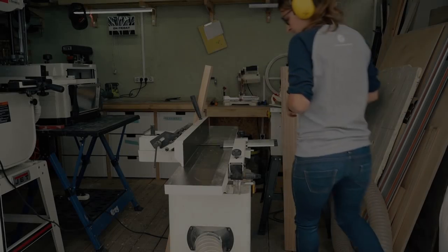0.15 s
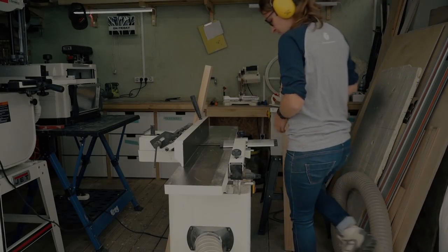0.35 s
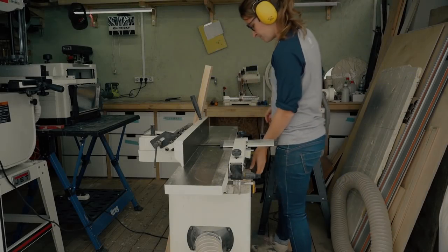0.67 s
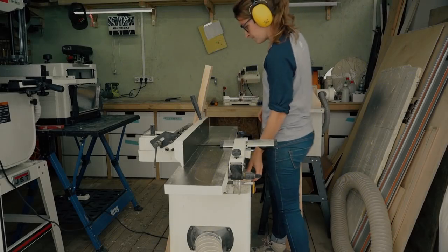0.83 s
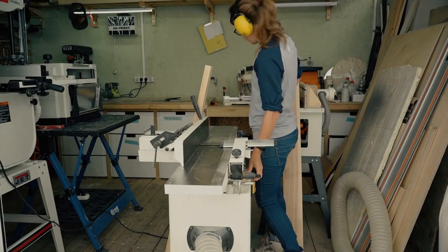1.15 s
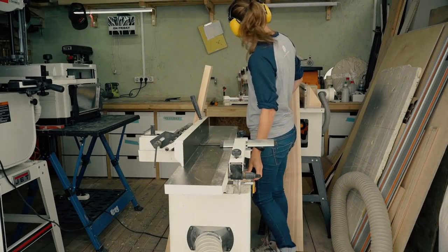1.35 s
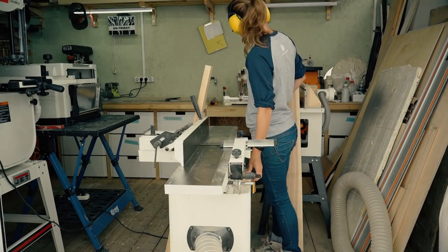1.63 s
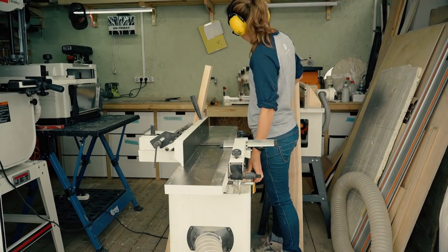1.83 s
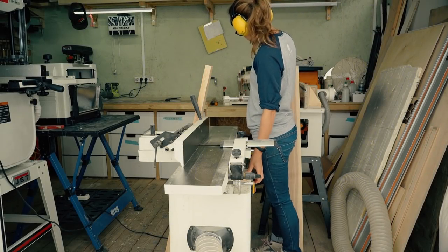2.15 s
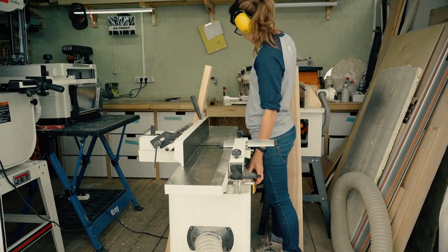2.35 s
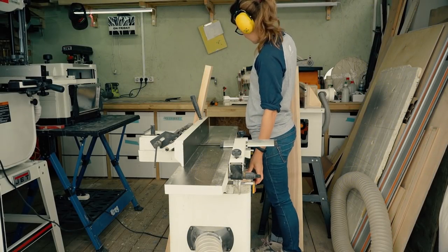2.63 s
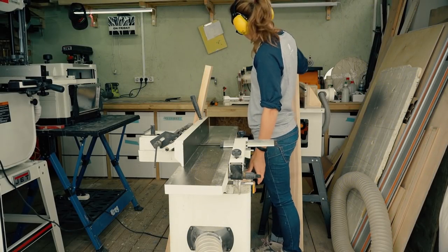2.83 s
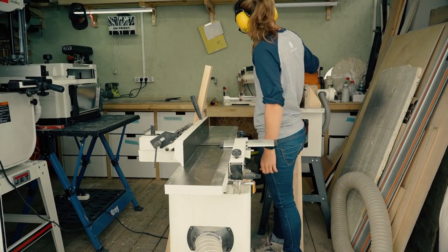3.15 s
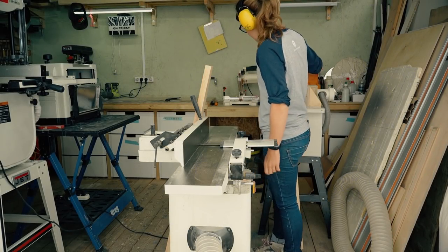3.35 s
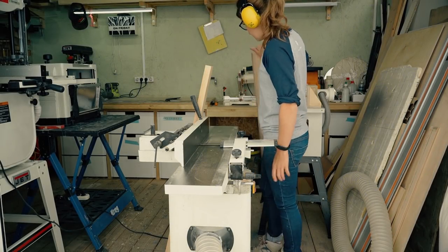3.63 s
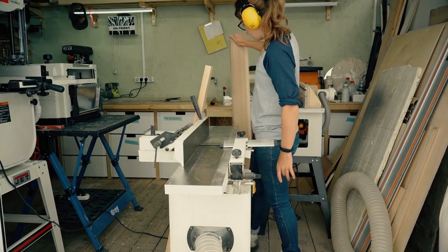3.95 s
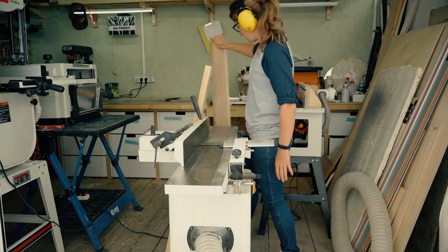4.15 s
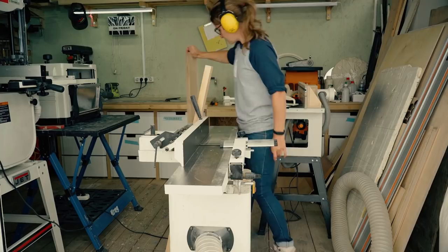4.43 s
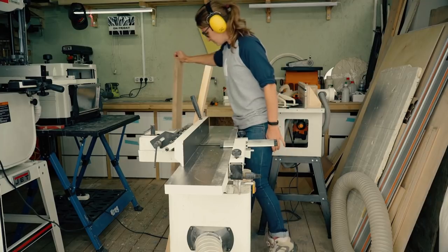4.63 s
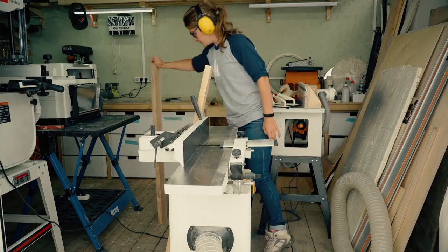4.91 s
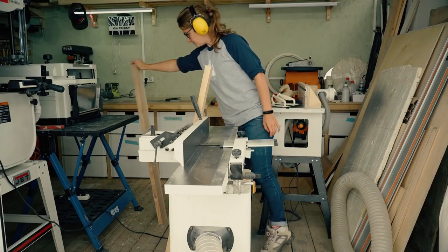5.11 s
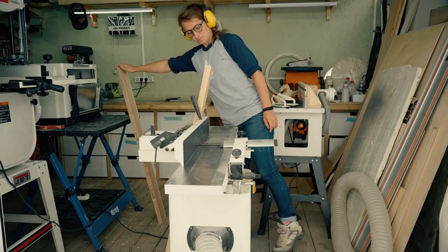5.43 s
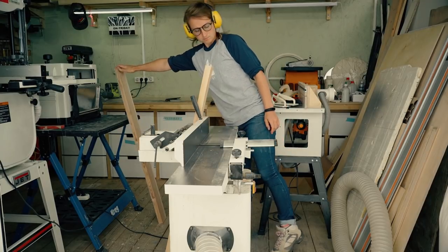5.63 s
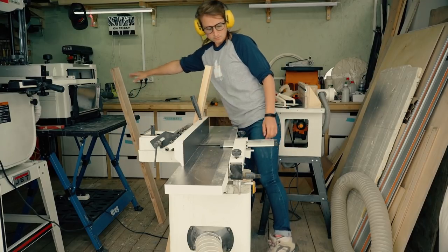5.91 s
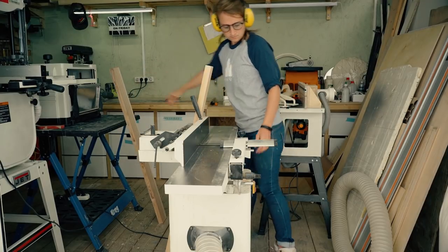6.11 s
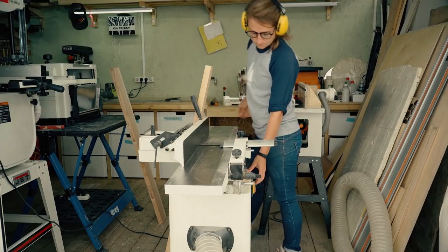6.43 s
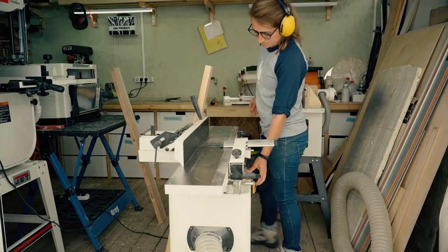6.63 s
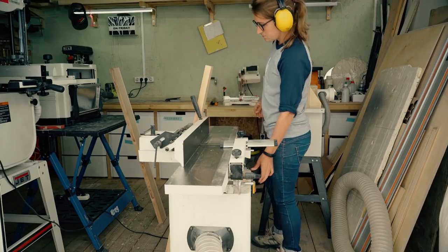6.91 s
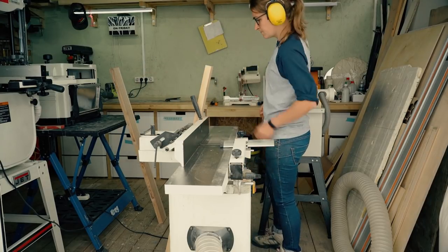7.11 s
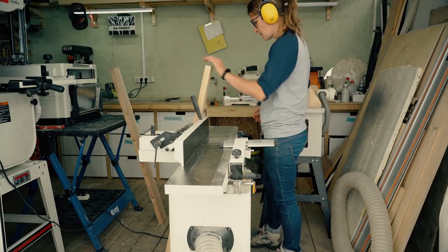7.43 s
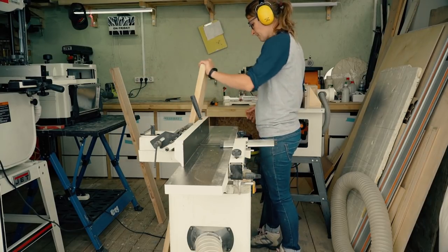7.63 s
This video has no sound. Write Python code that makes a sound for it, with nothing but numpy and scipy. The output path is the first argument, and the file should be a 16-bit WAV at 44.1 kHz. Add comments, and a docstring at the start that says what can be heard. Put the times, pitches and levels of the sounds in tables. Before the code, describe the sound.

Boards thump and knock on a plank floor in a quiet workshop, then a woodworking machine switches on, whining and squealing into a steady rushing hum.

```python
"""A small workshop with a plank floor, quiet but for a low rumble of feet and a faint hum.
Boards are stood on the floor and leaned against a bench: blows ring decaying modes and the room.
A jointer's fence slides, sleeves brush and wood creaks: swells of random catches; a leaning board rocks to rest.
Then the jointer is switched on: gliding tones growl, whine and squeal as the motor strains and the belt slips.
The cutterhead settles into a hum of steady partials in a rush of coloured noise."""
import sys
import numpy as np
from scipy import signal
from scipy.fft import rfft, irfft, next_fast_len
from scipy.io import wavfile
from scipy.ndimage import map_coordinates

SR = 44100
rng = np.random.default_rng(int(sys.argv[2]) if len(sys.argv) > 2 else 0)


def file_out(sig):
    """Save sig as 16-bit WAV at sys.argv[1]."""
    # one column per channel
    cols = np.atleast_2d(sig).T
    # limit, then scale
    lim = np.clip(cols, -1, 1)
    pcm = np.round(lim * 32767).astype(np.int16)
    wavfile.write(sys.argv[1], SR, pcm)


N = 342216


def amp(db):
    """Decibels to gain."""
    return 10 ** (np.asarray(db) / 20)


def unit(x):
    """x at rms 1."""
    return x / np.sqrt(np.mean(x ** 2) + 1e-20)


def along(points, hz):
    """(Hz, value) points interpolated on a log frequency axis."""
    point_hz, values = np.transpose(points)
    return np.interp(np.log(hz + 1), np.log(point_hz + 1), values)


def curves(rows):
    """One value per sample for each column after the time."""
    s, *columns = np.transpose(rows)
    return [np.interp(np.arange(N) / SR, s, column) for column in columns]


def wobble(knots_per_s):
    """A smooth random curve of rms 1."""
    knots = rng.standard_normal(N // 20)
    return unit(map_coordinates(knots, [np.arange(N) * knots_per_s / SR], mode="wrap"))


def swell(full_s, hold_s, rise_db_per_s, fall_db_per_s):
    """A gain that climbs to 1, holds and dies away, at constant dB per second."""
    t = np.arange(N) / SR - full_s
    return amp(-rise_db_per_s * np.maximum(-t, 0) - fall_db_per_s * np.maximum(t - hold_s, 0))


def resonant(peaks, hz):
    """Summed gain of (Hz, width Hz, dB) resonances; width is taken at half gain."""
    return sum(amp(db) / (1 + (2 * (hz - centre) / width) ** 2) for centre, width, db in peaks)


def coloured(x, gain):
    """x through a causal minimum-phase filter with gain(hz), built by folding the cepstrum."""
    n = x.shape[-1]
    m = 2 * next_fast_len(n // 2 + 4096)
    log_gain = np.log(np.maximum(gain(np.fft.rfftfreq(m, 1 / SR)), 1e-6))
    cepstrum = irfft(log_gain, m)
    cepstrum[1:m // 2] *= 2
    cepstrum[m // 2 + 1:] = 0
    return irfft(rfft(x, m) * np.exp(rfft(cepstrum)), m)[..., :n]


def shaped(x, spectrum):
    """x with a (Hz, dB) colour."""
    return coloured(x, lambda hz: amp(along(spectrum, hz)))


# Stereo width of noise. Each row: frequency in Hz, left-right correlation (0-1).
LEFT_RIGHT_LIKENESS = [(100, .96), (300, .93), (600, .86), (1000, .82), (2500, .7), (5000, .38),
                       (12000, .22)]


def stereo_noise(size):
    """White noise, nearly mono in the bass and wide in the treble, from a mid and a side part."""
    m = next_fast_len(size)
    likeness = along(LEFT_RIGHT_LIKENESS, np.fft.rfftfreq(m, 1 / SR))
    turn = np.arccos(np.clip(likeness, -1, 1)) / 2
    white = rfft(rng.standard_normal((2, m)))
    mid, side = irfft(white * [np.cos(turn), np.sin(turn)], m)
    return np.array([mid + side, mid - side])[:, :size]


def noise(spectrum):
    """Coloured stereo noise of rms 1."""
    return unit(shaped(stereo_noise(N), spectrum))


# Room decay at length 1. Each row: frequency in Hz, t60 in seconds.
ROOM_DECAY = [(70, 0.94), (135, 0.69), (250, 0.28), (700, 0.44), (2000, 0.35), (5000, 0.3), (12000, 0.3)]


def shop(direct_db, length=1):
    """The room's answer to a click, left energy 1: direct sound plus a tail whose treble dies before its bass."""
    hz, t, z = signal.stft(stereo_noise(SR), SR, nperseg=256)
    decay = amp(-60 * t / (length * along(ROOM_DECAY, hz)[:, None]))
    tail = signal.istft(z * decay, SR, nperseg=256)[1][:, :SR]
    tail /= np.linalg.norm(tail[0])
    tail[:, 0] += amp(direct_db)
    return tail / np.linalg.norm(tail[0])


def add(track, s, sound):
    """Mix a sound in at s seconds."""
    start = max(round(s * SR), 0)
    track[:, start:start + sound.shape[1]] += sound[:, :N - start]


def tone(hz):
    """A sine of rms 1 that follows a pitch curve from a random phase."""
    return np.sqrt(2) * np.sin(2 * np.pi * (np.cumsum(hz) / SR + rng.random()))


def blows(table, modes, spectrum, ring_db, direct_db, length, scatter_db, spot_db):
    """Each blow rings decaying modes and sends a burst into the room; the struck spot favours one range."""
    out, t = np.zeros((2, N)), np.arange(SR) / SR
    sides = np.array([[.5], [-.5]])
    for s, db, bass_db, treble_db, spot_hz in table:
        ring = np.zeros((2, SR))
        for k, (mode_hz, mode_db, t60) in enumerate(modes):
            decay = amp(mode_db + scatter_db * rng.normal() - 60 * t / t60)
            balance = 1 + 0.04 * sides * rng.normal()
            ring += (-1) ** k * decay * np.sin(2 * np.pi * mode_hz * t) * balance
        burst = unit(shaped(shop(direct_db, length), spectrum))
        hit = amp(ring_db) * unit(ring) + burst
        contact = [(140, bass_db), (330, 0.026), (700, 0), (4000, treble_db)]

        def contact_gain(hz):
            spot = np.exp(-(np.log2((hz + 1) / spot_hz) / 0.33) ** 2)
            return amp(along(contact, hz) + spot_db * spot)

        hit = coloured(hit, contact_gain)
        onset_rms = np.sqrt(np.mean(hit[:, :SR // 32] ** 2))
        add(out, s, amp(db) * hit / onset_rms)
    return out


# The leaning board rocks to rest; each flight is FLIGHT_SHRINK times the one before.
BOUNCE_S, FLIGHT_S, FLIGHT_SHRINK, BOUNCE_LOSS_DB = 5.983, 0.078, 0.7, 4


def rocking(first_db, bass_db, treble_db, spot_hz, count):
    """Contacts of the leaning board, ever sooner and weaker."""
    flights = [FLIGHT_SHRINK ** k for k in range(count - 1)]
    times = BOUNCE_S + FLIGHT_S * np.cumsum([0] + flights)
    return [(s, first_db - BOUNCE_LOSS_DB * k, bass_db, treble_db, spot_hz) for k, s in enumerate(times)]


# Boards and feet landing on the floor. Each row: start in seconds, level in dB, bass in dB, treble in dB,
# favoured frequency in Hz.
FLOOR_THUMPS = [(0.0, -32.5, -5.5, -2.5, 327), (0.747, -43, -3.5, 7, 350), (0.829, -51.5, -21, -8, 298),
                (2.33, -60, 18, -8, 137), (3.128, -57, 1, -8, 245), (4.971, -13.5, -1.5, -14.5, 217),
                (6.398, -51, 4, -3, 280)]
# Wood knocking on wood and iron. Each row: start in seconds, level in dB, bass in dB, treble in dB,
# favoured frequency in Hz.
WOOD_KNOCKS = [(0.002, -49, -22, 0, 433), (0.071, -48.5, 17, 18.5, 138), (0.770, -55, -6, -2, 2300),
               (4.506, -56.5, -18, 6, 397), (4.674, -59.5, -23, 7, 390), (4.973, -34, -2.5, 8.5, 965),
               (5.835, -34.5, -2.5, 1.5, 1590), (5.842, -34.5, -4, -4, 306), (5.866, -37, -9, 5, 322),
               (6.438, -61.5, 1, 8, 390), (6.556, -57.5, 0, 0, 2760)]
# The drive jolts at switch-on. Each row: start in seconds, level in dB, treble in dB, favoured frequency in Hz.
DRIVE_JOLTS = [(6.715, -42.5, -9, 690), (6.742, -38.5, -3.5, 1190)]
# Small hard contacts and the switch. Each row: start in seconds, level in dB, treble in dB.
HARD_CLICKS = [(0.008, -47, 2), (4.504, -55, 2.5), (4.978, -46, 2), (5.835, -51, -0.5), (6.061, -58.5, 0),
               (6.745, -52.5, 16.5)]
# Ringing of the planks under a board. Each row: frequency in Hz, relative level in dB, t60 in seconds.
PLANK_MODES = [(72, -16, .4), (112, -10, .2), (131, -23, 1.1), (140, -23, .9), (180, -5, .12),
               (203, -1, .22), (240, -3, .18), (283, -2, .2), (385, -11, .26), (445, -12, .15),
               (499, -13, .25), (575, -21, .3), (745, -22, .15), (955, -15, .24), (1066, -20, .17),
               (1170, -21, .22)]
# Ringing of a board. Each row: frequency in Hz, relative level in dB, t60 in seconds.
BOARD_MODES = [(255, -6, .15), (323, 0, .17), (501, -11, .25), (807, -14, .3), (1222, -16, .33),
               (1437, -17, .3), (1600, -11, .15), (1739, -16, .27), (1820, -16, .3), (2315, -16, .25),
               (3090, -21, .3), (3365, -26, .45), (4624, -26, .18)]
# Colour of a thump's burst. Each row: frequency in Hz, gain in dB.
THUMP_COLOUR = [(24, -95), (40, -38), (116, -5.5), (156, 2.5), (211, -15), (298, -9), (329, -8), (454, -10),
                (502, -15), (693, -18), (933, -35), (1260, -61), (2990, -44), (15000, -53.5)]
# Colour of a knock's burst. Each row: frequency in Hz, gain in dB.
KNOCK_COLOUR = [(47, -28), (80, -0.5), (206, -2), (321, -2.5), (436, -5.5), (498, 0), (725, -10.5),
                (791, -5), (864, -7.5), (1870, -17), (2490, -16.5), (15500, -45.5)]
# Colour of a click's burst. Each row: frequency in Hz, gain in dB.
CLICK_COLOUR = [(150, -6.5), (500, 4.5), (1500, -1.5), (3500, -6.5), (6000, -7.5), (11000, -6),
                (15500, -19)]
CLICK_BASS_DB, CLICK_HZ, JOLT_BASS_DB = -3, 3000, -30


def impacts():
    """Thumps ring the floor; knocks, jolts and clicks ring a board; the rocking board's foot and tip do both."""
    on_floor = FLOOR_THUMPS + rocking(first_db=-44, bass_db=4, treble_db=-5, spot_hz=290, count=3)
    on_wood = WOOD_KNOCKS + rocking(first_db=-50.5, bass_db=-9, treble_db=0, spot_hz=1580, count=3)
    on_wood += [(s, db, JOLT_BASS_DB, treble_db, hz) for s, db, treble_db, hz in DRIVE_JOLTS]
    hard = [(s, db, CLICK_BASS_DB, treble_db, CLICK_HZ) for s, db, treble_db in HARD_CLICKS]
    thumps = blows(on_floor, PLANK_MODES, THUMP_COLOUR,
                   ring_db=1, direct_db=-3.5, length=0.91, scatter_db=0.5, spot_db=4.5)
    knocks = blows(on_wood, BOARD_MODES, KNOCK_COLOUR,
                   ring_db=-7, direct_db=-19, length=1, scatter_db=4.5, spot_db=8)
    clicks = blows(hard, BOARD_MODES, CLICK_COLOUR,
                   ring_db=-14, direct_db=-4, length=0.4, scatter_db=2, spot_db=4)
    return thumps + knocks + clicks * amp([[-3], [2]])  # clicks sit to the right


def strokes(table, body, grain_db, direct_db):
    """Sliding contact: a swell of tiny uneven catches through the body's response, low-passed at top_hz."""
    out, t = np.zeros((2, N)), np.arange(SR // 2) / SR - 1 / 4
    for s, db, rise, fall, top_hz in table:
        envelope = np.exp(-np.where(t < 0, (t / rise) ** 2, t / fall))
        grain = np.minimum(rng.standard_normal(len(t)), 3)
        catches = rng.standard_normal(len(t)) * amp(grain_db * grain)
        rub = unit(coloured(catches, lambda hz: body(hz) / np.sqrt(1 + (hz / top_hz) ** 6)))
        heard = signal.fftconvolve((envelope * rub)[None], shop(direct_db), axes=1)
        add(out, s + t[0], amp(db) * heard)
    return out


# Sliding strokes and scuffs. Each row: peak in seconds, level in dB, rise in seconds, fall in seconds,
# low-pass in Hz.
SLIDES = [(0.790, -48, 0.035, 0.012, 14000), (0.852, -53, 0.011, 0.0082, 4450),
          (1.270, -60, 0.041, 0.0092, 4500), (1.386, -39.5, 0.0092, 0.025, 8000),
          (2.732, -42.5, 0.0056, 0.011, 1520), (2.749, -38, 0.0097, 0.02, 4460),
          (3.450, -65, 0.061, 0.028, 12000), (4.785, -61, 0.061, 0.075, 11000)]
# Sleeves and hands brushing the wood. Each row: peak in seconds, level in dB.
SLEEVE_BRUSHES = [(0.43, -69.5), (0.80, -59), (1.415, -56.5), (3.425, -67), (3.93, -70), (4.255, -65),
                  (4.385, -65.5), (4.78, -68)]
# Wood creaking under the hand. Each row: peak in seconds, level in dB, rise and fall in seconds, low-pass in Hz.
WOOD_CREAKS = [(1.275, -61, 0.014, 3800), (1.91, -74, .03, 1500), (2.335, -71, 0.025, 2800),
               (2.679, -54, 0.021, 6000), (5.235, -67.5, 0.054, 2200), (5.785, -63, 0.073, 2580)]
# Colour of sliding. Each row: frequency in Hz, gain in dB.
SLIDE_COLOUR = [(50, -38.5), (130, 2), (350, -6), (650, -5), (800, -4.5), (1050, -10.5), (1550, -6),
                (1950, -4.5), (2700, -7.5), (5000, -15), (15500, -26)]
# Colour of brushing cloth. Each row: frequency in Hz, gain in dB.
CLOTH_COLOUR = [(1500, -19), (5000, -4), (10000, 4), (15000, 1.5)]
# Tones of a creak. Each row: frequency in Hz, width in Hz, gain in dB.
CREAK_PEAKS = [(1180, 70, -7), (1620, 85, 0), (2030, 70, -3), (2450, 130, -3), (2980, 140, -4),
               (4200, 200, -8), (5150, 200, -14)]
# Dry rub under those tones. Each row: frequency in Hz, width in Hz, gain in dB.
CREAK_DRY_RUB = [(2900, 2700, -13)]
BRUSH_RISE_S, BRUSH_FALL_S, BRUSH_TOP_HZ = 0.038, 0.031, 14000


def friction():
    """The fence and boards slide, sleeves brush, wood creaks and metal squeaks, all a little to the right."""
    sleeves = [(s, db, BRUSH_RISE_S, BRUSH_FALL_S, BRUSH_TOP_HZ) for s, db in SLEEVE_BRUSHES]
    grips = [(s, db, length, length, top_hz) for s, db, length, top_hz in WOOD_CREAKS]
    scrapes = strokes(SLIDES, lambda hz: amp(along(SLIDE_COLOUR, hz)), grain_db=7.5, direct_db=0.5)
    brushes = strokes(sleeves, lambda hz: amp(along(CLOTH_COLOUR, hz)), grain_db=12, direct_db=4)
    creaks = strokes(grips, lambda hz: resonant(CREAK_PEAKS + CREAK_DRY_RUB, hz), grain_db=12, direct_db=-1)
    return (scrapes + brushes + creaks + squeak()) * amp([[-.4], [.4]])


def squeak():
    """A thin metal squeak just before the fence slides: two unsteady high tones."""
    gain = amp(-74) * swell(1.3, hold_s=0.02, rise_db_per_s=500, fall_db_per_s=450)
    return gain * sum(amp(2 * wobble(59.5)) * tone(hz + 40 * wobble(200)) for hz in (10400, 12450))


# RUN_UP_S is the time to 63 % of full speed; a larger shape makes the climb more S-shaped.
START_S, RUN_UP_S, RUN_UP_SHAPE = 6.716, 0.175, 1.3


def shaft_speed():
    """Share of full speed: the motor pulls hard at first, then eases into its running speed."""
    since_start = np.maximum(np.arange(N) / SR - START_S, 0)
    return 1 - np.exp(-(since_start / RUN_UP_S) ** RUN_UP_SHAPE)


def powered(attack_s):
    """0 before the switch-on, 1 from attack_s after it."""
    return np.clip((np.arange(N) / SR - START_S) / attack_s, 0, 1) ** 2


SLIP_S, SLIP_HOLD_S = 7.04, 0.043  # worst slip, just short of full speed


def slipping():
    """How hard the belt slips, 0-1: it builds with the pull and ends quickly once the belt grips."""
    return swell(SLIP_S, SLIP_HOLD_S, rise_db_per_s=187, fall_db_per_s=270)


def singing(hz, gain, width_hz, flutter_db, wet_db, octave_db):
    """A gliding resonance with its octave, shaken unevenly so that its line is blurred, plus room."""
    pitch = hz + width_hz * wobble(240)
    pair = tone(pitch) + amp(octave_db) * tone(2 * pitch)
    line = gain * unit(pair * amp(flutter_db * wobble(110)))
    room = signal.fftconvolve(line[None], shop(direct_db=-42.5), axes=1)[:, :N]
    return line + amp(wet_db) * room


# Whine of the straining drive, flaring as the belt begins to slip.
# Each row: time in seconds, pitch in Hz, level in dB before WHINE_TRIM_DB.
DRIVE_WHINE = [(6.73, 653, -37.5), (6.79, 701, -47.5), (6.87, 740, -33.5), (6.95, 675.5, -31),
               (6.992, 715.6, -20.5), (7.03, 750, -25), (7.07, 783, -29.5), (7.11, 881, -35.5),
               (7.2, 960, -43)]
WHINE_TRIM_DB = -1
GROWL_HZ, GROWL_RISE_HZ, GROWL_DB = 272, 22.1, -29  # pitch at rest, rise to full speed, peak level
SQUEAL_HZ, SQUEAL_GLIDE_HZ_PER_S, SQUEAL_DB = 2800, 2800, -35


def run_up():
    """The straining motor sweeps the cabinet's resonances and the belt slips until the cutterhead catches up."""
    speed, on = shaft_speed(), powered(attack_s=0.015)
    strain = on * swell(6.84, hold_s=0.079, rise_db_per_s=151, fall_db_per_s=65)
    growl = singing(GROWL_HZ + GROWL_RISE_HZ * speed, amp(GROWL_DB) * strain,
                    width_hz=18, flutter_db=1.5, wet_db=-12, octave_db=-14)
    whine_hz, whine_db = curves(DRIVE_WHINE)
    pull = on * swell(START_S, hold_s=0.46, rise_db_per_s=0, fall_db_per_s=110)
    whine = singing(whine_hz, amp(whine_db + WHINE_TRIM_DB) * pull,
                    width_hz=45, flutter_db=1.3, wet_db=-10, octave_db=-15)
    squeal_hz = SQUEAL_HZ + SQUEAL_GLIDE_HZ_PER_S * np.clip(np.arange(N) / SR - SLIP_S, -.5, .5)
    squeal = singing(squeal_hz, amp(SQUEAL_DB) * on * slipping(),
                     width_hz=150, flutter_db=2, wet_db=-0.5, octave_db=-32)
    # under load the cutterhead's partials climb with the speed
    load = on * swell(7.0, hold_s=0.11, rise_db_per_s=72, fall_db_per_s=120)
    partials = [(890, -2), (995, -2), (1330, -8.5), (1770, -11), (2000, -13)]
    climb = sum(amp(db + 2 * wobble(60)) * tone(hz * speed * (1 + 0.025 * wobble(200))) for hz, db in partials)
    return growl + whine + squeal + amp(-40) * load * climb


# Lines of the cutterhead. Each row: multiple of CUTTER_HZ, level at full speed in dB.
CUTTER_LINES = [(4, -41.5), (8, -43), (9, -46.5), (10, -61), (12, -47.5), (16, -60), (20, -57), (22, -58),
                (32, -60)]
# Lines of the motor shaft. Each row: multiple of MOTOR_HZ, level at full speed in dB.
MOTOR_LINES = [(1, -55), (4, -45.5), (6, -51), (9, -57), (12, -49.5)]
# Cabinet panels kept ringing by the machine. Each row: frequency in Hz, level at full speed in dB.
PANEL_TONES = [(65, -49.5), (133, -51.5), (225, -46.5), (280, -48.5), (500, -74), (587, -52.5),
               (1142, -52.5), (1243, -72), (2138, -55.5), (2284, -61)]
CUTTER_HZ, MOTOR_HZ = 110.83, 58.3  # at full speed


def hum():
    """Cutterhead and motor lines rise in pitch and strength with the speed, and shake the panels."""
    speed = shaft_speed()
    turning = speed * (1 + 0.0011 * wobble(14))
    lines = [(k * CUTTER_HZ, db) for k, db in CUTTER_LINES] + [(k * MOTOR_HZ, db) for k, db in MOTOR_LINES]
    shafts = sum(amp(db + 1.6 * wobble(16)) * tone(hz * turning) for hz, db in lines)
    panels = sum(amp(db + 2.8 * wobble(9.8)) * tone(hz + 3 * wobble(25)) for hz, db in PANEL_TONES)
    return speed ** 6 * shafts + speed ** 4 * panels


# Colour of the air. Each row: frequency in Hz, gain in dB.
AIR_COLOUR = [(120, -21), (200, -12.5), (227, -12), (316, -10), (408, -11.5), (439, -5), (472, -12.5),
              (681, -11), (746, -13), (896, -13.5), (1060, -15), (2230, -18), (2630, -21.5), (10800, -39),
              (15800, -51.5)]
# Cabinet resonances in the rushing air. Each row: frequency in Hz, width in Hz, relative gain in dB.
HOUSING_PEAKS = [(1238, 39, 6), (1544, 54, 2.5), (2127, 48, -1), (2270, 93, 4), (2820, 55, -10),
                 (3230, 120, -3.5), (3810, 260, -9), (4370, 450, -5)]
# Colour of the belt's hiss. Each row: frequency in Hz, gain in dB.
BELT_COLOUR = [(530, -36), (900, 11), (1100, -14.5), (1540, 0.5), (2430, -6), (2810, -6), (3290, -5),
               (4540, -10), (5060, -13.5), (12600, -23.5), (15800, -31)]
# Colour of the cabinet's rumble. Each row: frequency in Hz, gain in dB.
RUMBLE_COLOUR = [(20, -35.5), (35, -21), (50, 0), (64, 1), (80, 3.5), (105, -9), (135, 1), (185, -15.5),
                 (230, -5), (300, -13), (500, -51.5)]
AIR_DB, AIR_GROWS_DB, SURGE_DB = -37, 12.5, -34  # at full speed, less at rest, surge as the belt slips
SLIP_DB, DRAG_DB, BELT_DB = -33.5, -48, -58.5  # belt at worst slip, first dragging, running
SHUDDER_DB, SHAKE_DB = -39, -50.5  # cabinet running up, running


def rush():
    """Air thrown by the knives rings in the housing; the cabinet rumbles and the slipping belt hisses."""
    speed, on = shaft_speed(), powered(attack_s=0.052)
    ringing = unit(coloured(stereo_noise(N), lambda hz: resonant(HOUSING_PEAKS, hz)))
    flow = noise(AIR_COLOUR) + amp(-11) * ringing
    surge = amp(SURGE_DB) * swell(7.0, hold_s=0.03, rise_db_per_s=105, fall_db_per_s=200)
    air_gain = np.hypot(amp(AIR_DB - AIR_GROWS_DB * (1 - speed)), surge)
    air = air_gain * amp(0.72 * wobble(25) + 0.6 * wobble(200)) * flow
    rubbing = amp(SLIP_DB) * slipping() + amp(DRAG_DB) * (1 - speed) + amp(BELT_DB) * speed
    belt = rubbing * amp(0.7 * wobble(80)) * noise(BELT_COLOUR)
    shudder = amp(SHUDDER_DB) * swell(7.08, hold_s=0.25, rise_db_per_s=36, fall_db_per_s=90)
    rumble = np.hypot(shudder, amp(SHAKE_DB) * speed) * noise(RUMBLE_COLOUR)
    return on * (air + belt + rumble)


# Colour of the still air, before a tilt. Each row: frequency in Hz, gain in dB.
STILL_AIR_COLOUR = [(12, -53), (20, 1), (130, -4), (172, -7), (197, -9.5), (233, -8.5), (268, -5.5),
                    (300, -9), (456, -13), (539, -10.5), (2500, -24.5), (6120, -27), (15800, -31)]


def background():
    """Still air, a low rumble as feet move about and after the heavy landing, a faint hum that comes and goes."""
    feet = amp(-68.5) * swell(3.4, hold_s=3.3, rise_db_per_s=25, fall_db_per_s=20)
    landing = amp(-55.5) * swell(5.05, hold_s=0.1, rise_db_per_s=151, fall_db_per_s=14.5)
    rumble = noise([(15, -15.5), (35, -3.5), (60, 1.5), (150, -31), (600, -100)])
    pitch = 269 + wobble(6)
    partials = tone(pitch) + amp(-6) * tone(2 * pitch) + amp(-10.5) * tone(3 * pitch)
    faint_hum = amp(-72) * swell(3.06, hold_s=1.33, rise_db_per_s=63, fall_db_per_s=30) * partials
    air = shaped(noise(STILL_AIR_COLOUR), [(30, -7), (110, 0.5)])
    return amp(-62.5) * air + (feet + landing) * rumble + faint_hum


# Where the work is done around the machine. Each row: time in seconds, left over right in dB.
WORK_PLACE = [(0, -0.5), (0.75, -0.5), (1.4, -1.5), (4.5, -2), (4.97, 1.6), (5.85, 0.2), (6.5, -0.5)]


def scene():
    """Handling noises that move with the worker, then the jointer, over the quiet of the room."""
    pan_db, = curves(WORK_PLACE)
    handling = (impacts() + friction()) * amp(pan_db * np.array([[.5], [-.5]]))
    return handling + run_up() + hum() + rush() + background() * amp([[-.6], [.6]])


TOP_HZ = 15850


def record(dry):
    """Remove everything from TOP_HZ up with a sharp spectral cut."""
    m = next_fast_len(N + SR // 2)
    return irfft(rfft(dry, m) * (np.fft.rfftfreq(m, 1 / SR) < TOP_HZ), m)[:, :N]


dry = scene()
out = record(dry)
file_out(out)
```